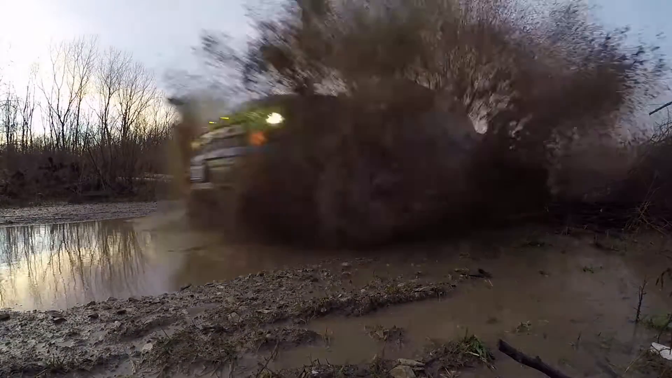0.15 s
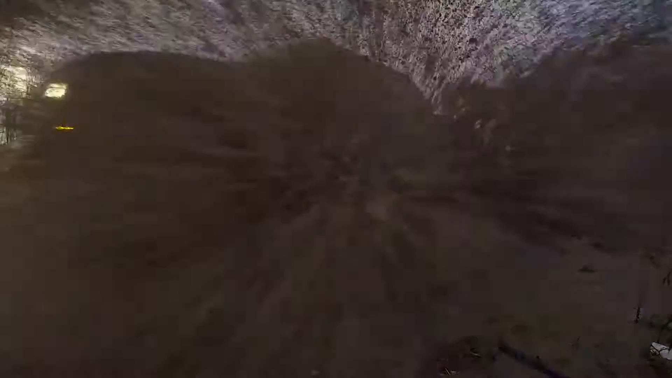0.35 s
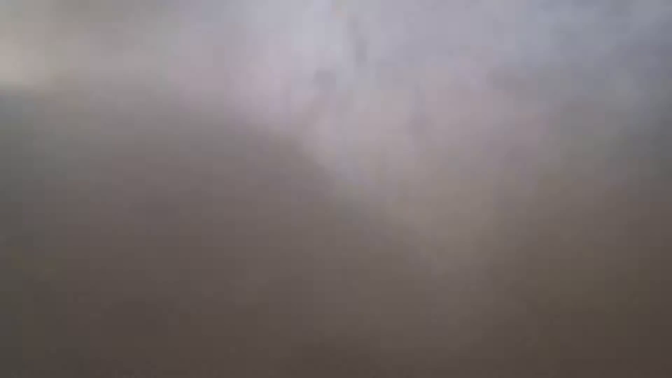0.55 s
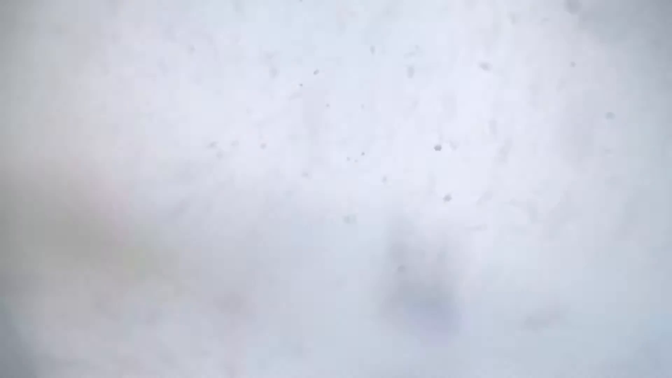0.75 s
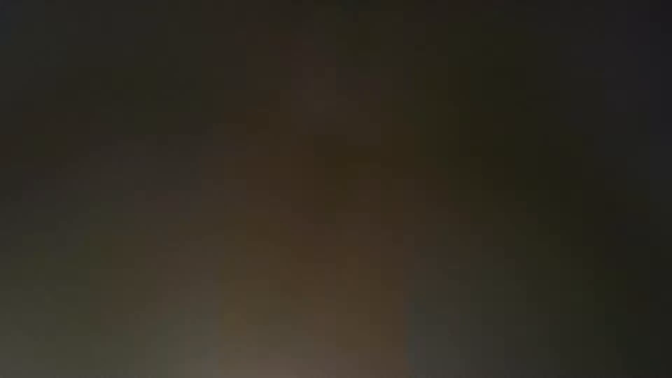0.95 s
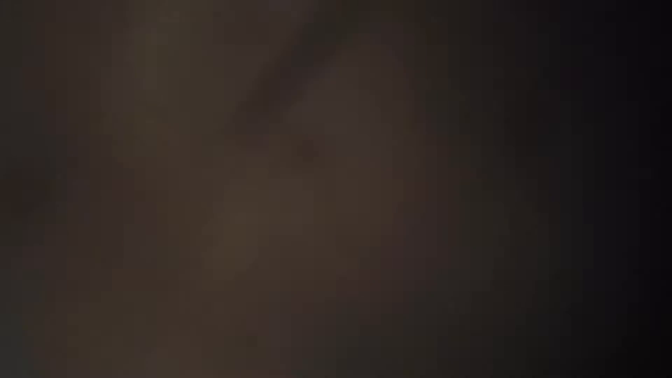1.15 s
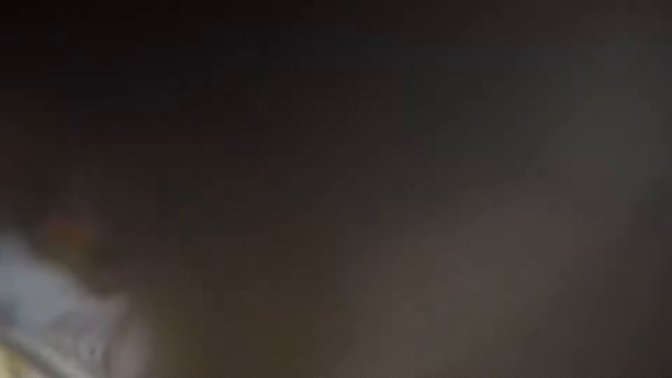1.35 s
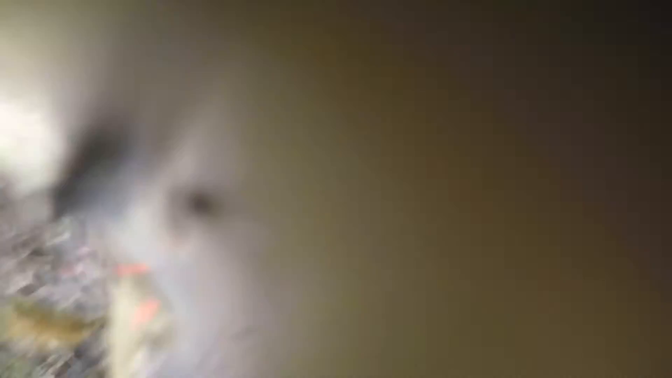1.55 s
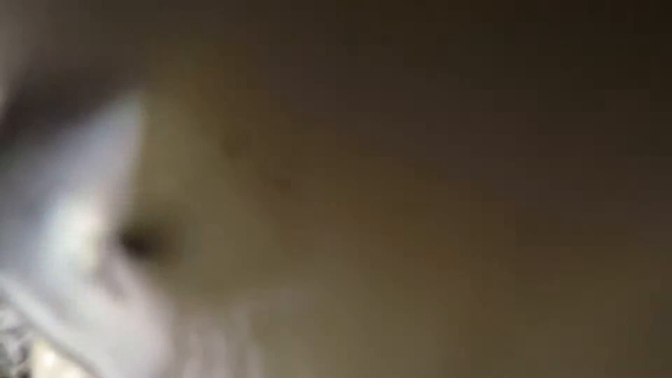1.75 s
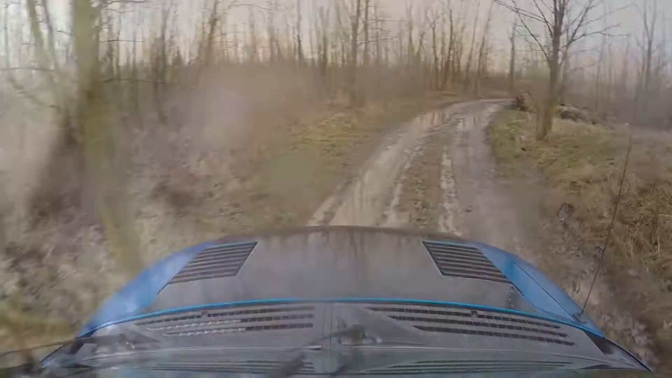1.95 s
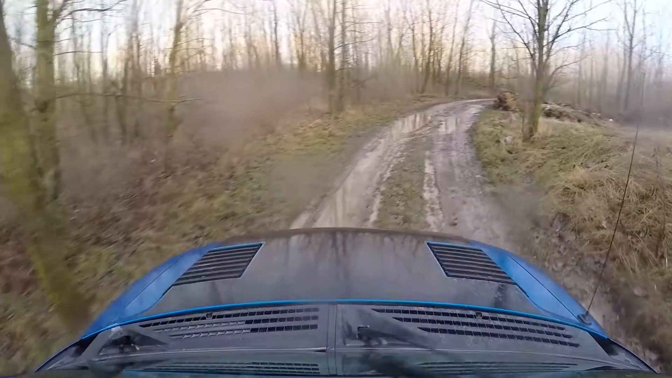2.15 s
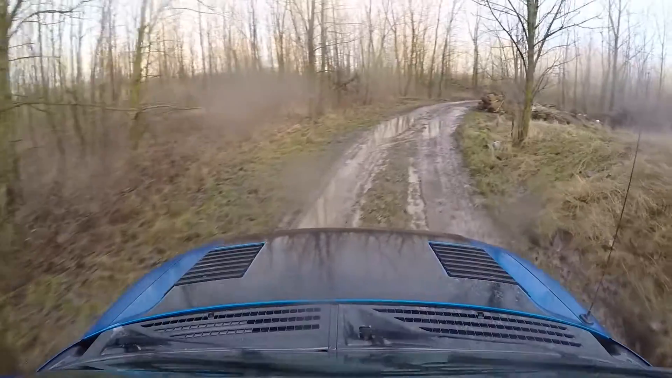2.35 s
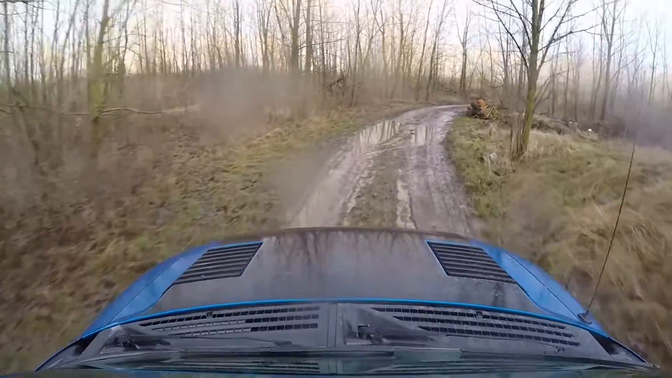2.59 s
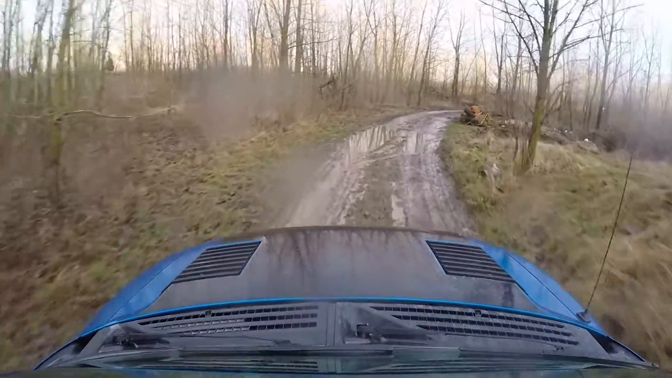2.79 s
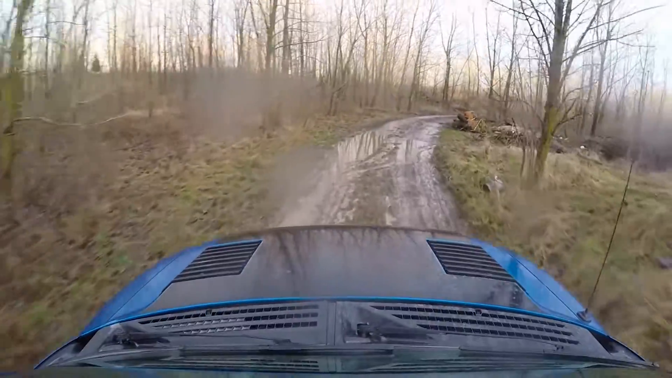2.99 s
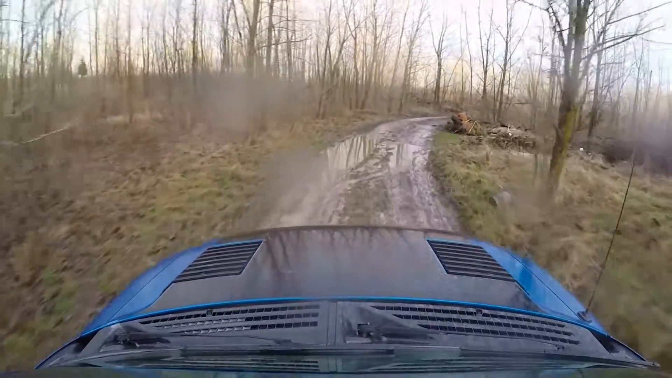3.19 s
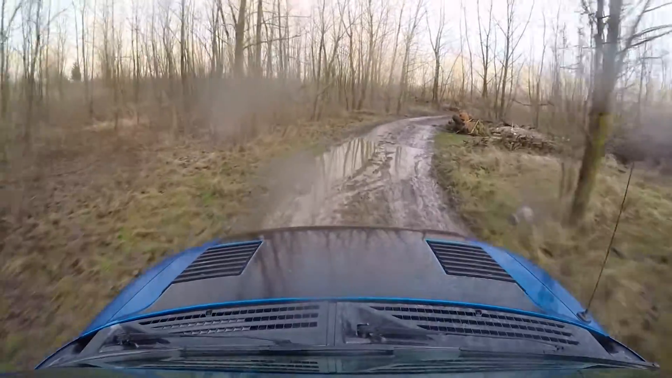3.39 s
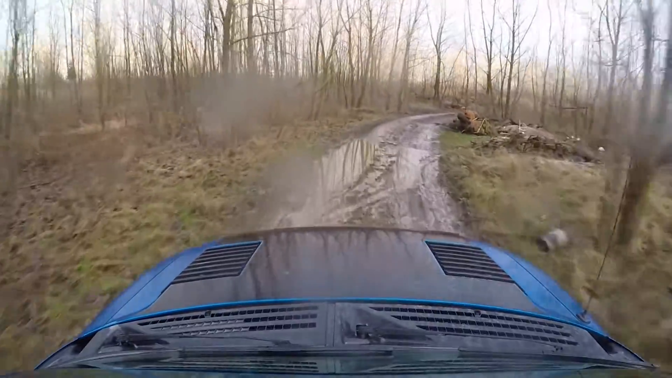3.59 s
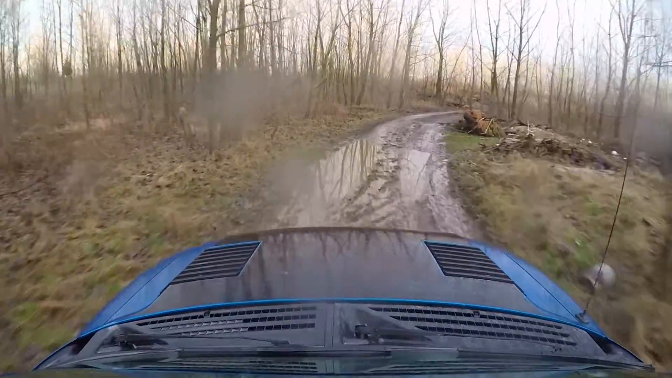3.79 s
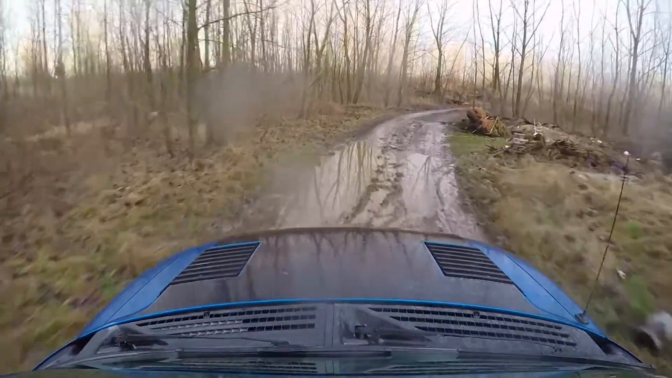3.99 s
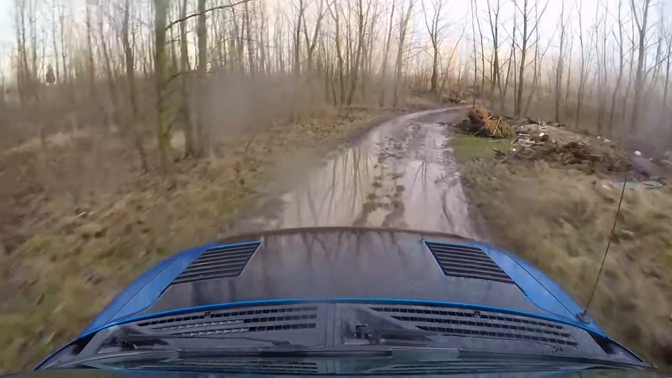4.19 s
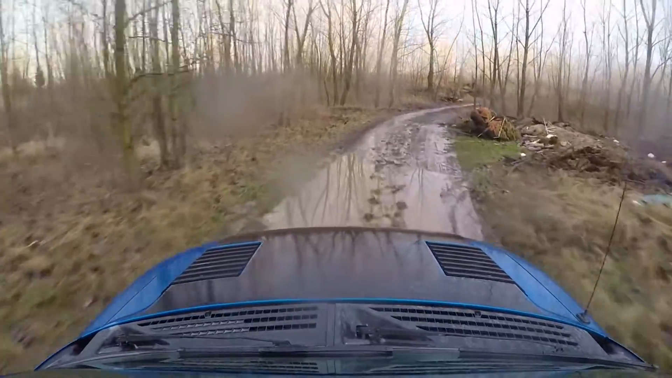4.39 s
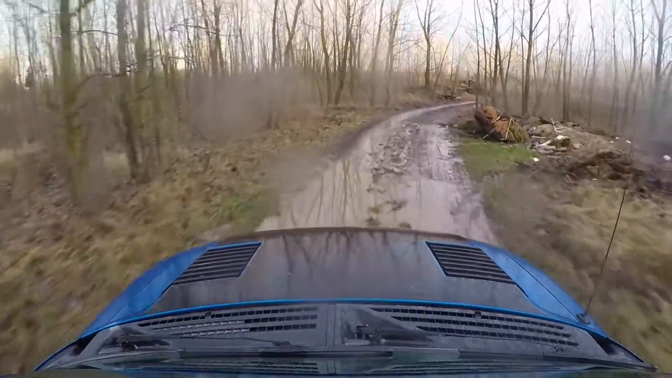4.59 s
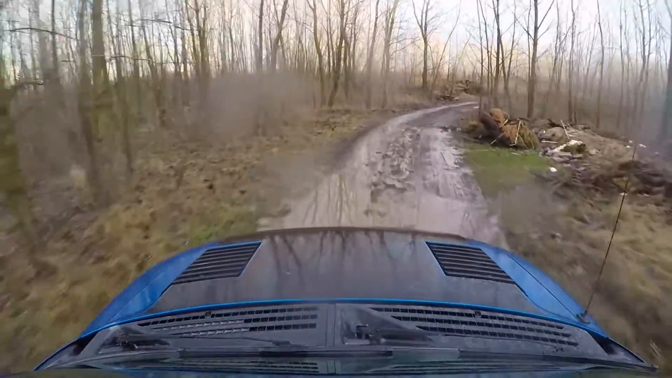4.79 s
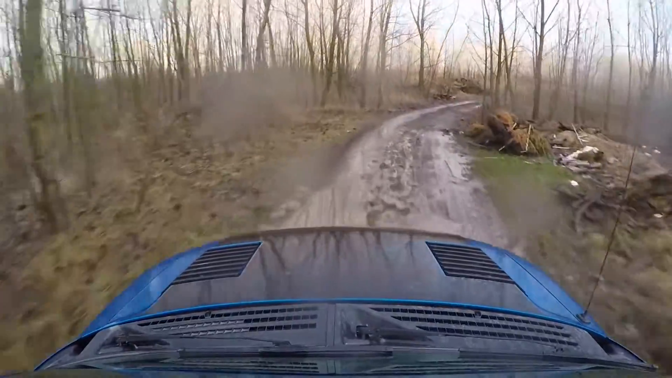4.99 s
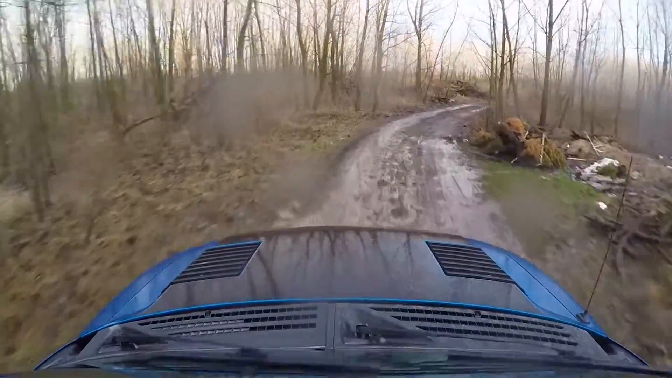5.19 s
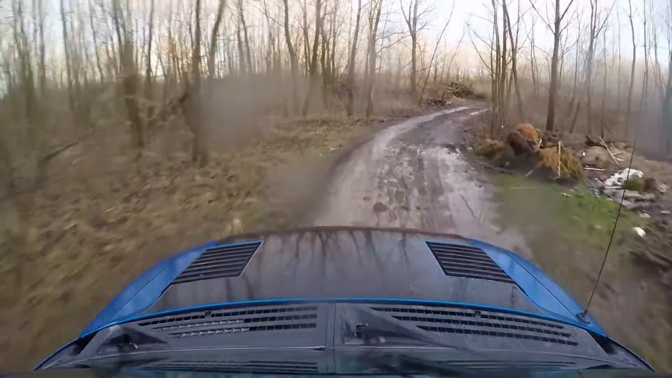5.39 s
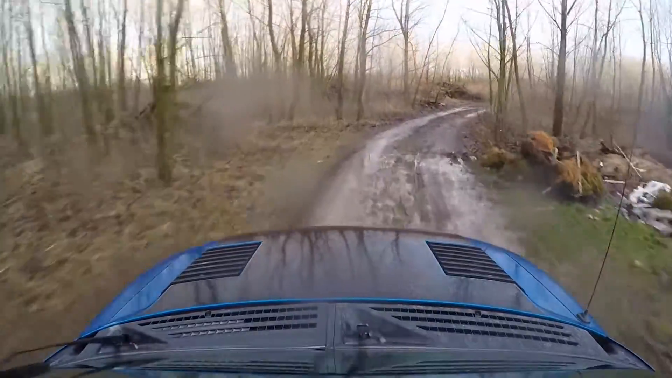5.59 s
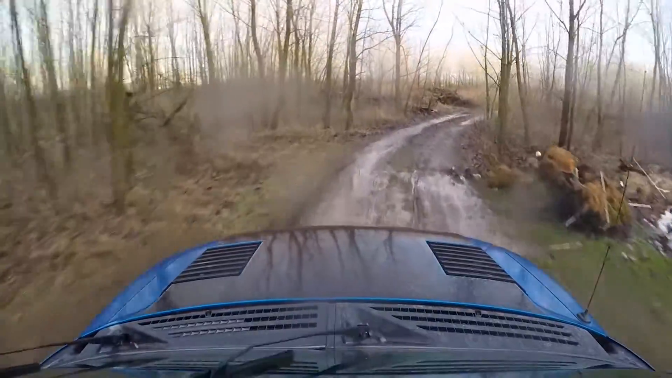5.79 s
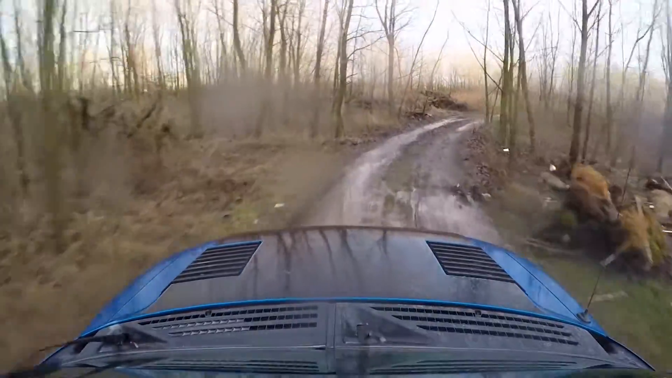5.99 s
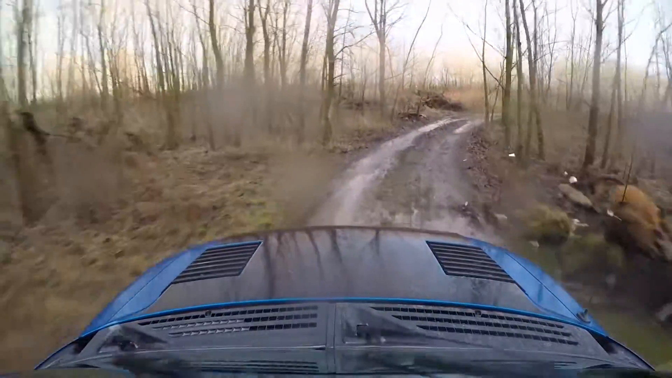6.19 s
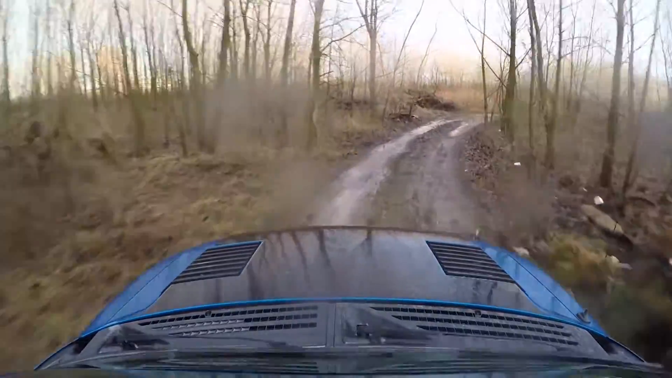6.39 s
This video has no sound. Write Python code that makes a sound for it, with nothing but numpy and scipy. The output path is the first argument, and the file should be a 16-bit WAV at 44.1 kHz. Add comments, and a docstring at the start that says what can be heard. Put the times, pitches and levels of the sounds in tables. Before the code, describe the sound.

Hissing spray and low rumble swell as a pickup drives through a puddle. At about 0.4 seconds a wave of mud hits the microphone housing with a loud cluster of wet slaps and thumps. The housing tumbles, with another hard blow near 0.9 seconds, then weaker knocks while spatter, trickling and sloshing die away. From 1.7 seconds the sound is heard from the truck's roof and is quieter: a deep fluttering shake, drumming panels and faint wet tyre hiss that slowly grows. The low engine drone climbs in pitch until about 5 seconds, then eases, swelling briefly near 3.5 and 5.9. A sharp click comes at 2.5 seconds, and trim buzzes faintly around 2.6 and 3.2. Ruts cause dull booms with metallic rattles near 1.9, 3.1, 4 to 4.6, 5.1 (the strongest) and 5.8. The ride continues to about 6.5 seconds.

```python
"""A puddle on a wet trail, heard from a small sealed microphone housing on the ground.
A pickup nears in swelling spray and rumble. Its wave of mud strikes the housing, which tumbles:
each impact excites the shell's modes and pushes the membrane, and then the water drains off.
From 1.7 s the housing rides on the truck's roof: the mount shakes, road noise drives the panels,
the engine drones, wet tyres hiss, trim buzzes and ruts knock the body."""
import sys
import numpy as np
from scipy import signal
from scipy.fft import rfft, irfft, next_fast_len
from scipy.io import wavfile
from scipy.ndimage import uniform_filter1d

SR = 44100
rng = np.random.default_rng(int(sys.argv[2]) if len(sys.argv) > 2 else 0)


def log_audio(samples):
    """Write samples as a 16-bit WAV file to the path given in sys.argv[1]."""
    # one column per channel
    frames = np.atleast_2d(samples).T
    # limit to full scale, then quantise
    limited = np.clip(frames, -1, 1)
    pcm = np.round(limited * 32767).astype(np.int16)
    wavfile.write(sys.argv[1], SR, pcm)


N = 284445
WAVE_S = .43   # the wave of mud arrives
ROOF_S, ROOF_FADE_S = 1.7, 0.16   # the ride on the roof fades in

# spectrum of the low rumble and slosh: f/Hz, density level/dB
SURGE_SPECTRUM = [(8.8, -43.5), (15, -26), (43, -7), (119, -1.5), (157, -15), (244, -7), (407, -26.5),
                  (500, -17), (650, -53.5), (1100, -120)]


def amp(db):
    """Amplitude ratio of a level in dB."""
    return 10 ** (np.asarray(db) / 20)


def unit(x):
    """Normalise to rms 1."""
    return x / np.sqrt(np.mean(x ** 2) + 1e-20)


def since(s):
    """Seconds elapsed since time s, zero before it."""
    return np.maximum(np.arange(N) / SR - s, 0)


def fade_in(s, lasts=0.021):
    """A gate that opens linearly from time s."""
    return np.minimum(since(s) / lasts, 1)


def in_time(rows):
    """A gate that opens at the first row, then each column interpolated over time."""
    s, *columns = np.transpose(rows)
    return [fade_in(s[0])] + [np.interp(since(0), s, c) for c in columns]


def colour(x, spectrum):
    """Spectral shaping by levels in dB interpolated over log frequency."""
    hz, level_db = np.transpose(spectrum)
    size = next_fast_len(N)
    log_hz = np.log(np.arange(size // 2 + 1) * SR / size + 1)
    gain = amp(np.interp(log_hz, np.log(hz), level_db, -120, -120))
    return irfft(rfft(x, size) * gain, size)[:N]


def cut(x, hz, kind, order=4):
    """Butterworth low- or high-pass."""
    return signal.sosfilt(signal.butter(order, hz, kind, fs=SR, output="sos"), x)


def resonate(x, modes):
    """Modal superposition with alternating signs; each mode is f/Hz, bandwidth/Hz, gain/dB."""
    out = 0
    for k, (hz, width_hz, level_db) in enumerate(modes):
        r = np.exp(-np.pi * max(width_hz, 5) / SR)
        gain = (-1) ** k * amp(level_db) * (1 - r * r) / 2
        feedback = [1, -2 * r * np.cos(2 * np.pi * hz / SR), r * r]
        out = out + signal.lfilter([gain, 0, -gain], feedback, x + 1e-18)
    return out


def drift(rate):
    """Smooth random fluctuation of rms 1, with `rate` new values a second."""
    knots = rng.standard_normal(int(N / SR * rate) + 2)
    curve = np.interp(np.arange(N) * rate / SR, np.arange(len(knots)), knots)
    return unit(uniform_filter1d(curve, int(SR / rate / 2)))


def noise(spectrum):
    """Gaussian noise of rms 1 with the given spectral shape."""
    return unit(colour(rng.standard_normal(N), spectrum))


def grains(per_s, spread_db):
    """A Poisson train of impulses of random size and sign."""
    sizes = amp(spread_db * np.minimum(rng.exponential(1, N), 4)) * rng.choice([-1, 1], N)
    return sizes * (rng.random(N) < per_s / SR)


def add(out, s, shape):
    """Superpose a transient at time s."""
    i = round(s * SR)
    out[i:i + len(shape)] += shape[:N - i]


def two_bands(x, body_db, treble_db, split_hz):
    """A crossover that gives body and treble levels of their own."""
    return amp(body_db) * unit(cut(x, split_hz, "low")) + amp(treble_db) * unit(cut(x, split_hz, "high"))


def relax(first_db, last_db, tau_s):
    """Exponential relaxation of a level after the wave lands."""
    return last_db + (first_db - last_db) * np.exp(-since(WAVE_S) / tau_s)


def trim_buzz():
    """Narrow resonances in series turn noise into a wavering tone that swells and fades at each buzz."""
    # peaks of the trim's vibration: t/s, level/dB
    buzzes = [(2.6, -59), (3.15, -58.5), (3.95, -64)]
    rise_db_per_s, fall_db_per_s = 83, 43
    envelope = sum(amp(db - rise_db_per_s * np.maximum(s - since(0), 0) - fall_db_per_s * since(s))
                   for s, db in buzzes)
    tone = resonate(resonate(rng.standard_normal(N), [(995, 51, 0)]), [(964, 110, 0)])
    return unit(tone) * envelope * amp(4.0 * drift(14.0))


def tyre_hiss():
    """Broadband noise of wet tyres, growing with speed and coloured by cavity resonance in the housing."""
    # spectrum of the hiss: f/Hz, density level/dB
    spectrum = [(300, -36), (450, -8.5), (1400, -2), (3000, -12), (6000, -23.5), (9000, -27), (14500, -34),
                (16000, -61)]
    # strength of the hiss below the crossover: t/s, level/dB
    levels = [(1.7, -65), (2.1, -59.5), (3.4, -55.5), (3.9, -53.5), (5.0, -53), (5.75, -50), (6.45, -49)]
    # resonances of the sealed housing: f/Hz, bandwidth/Hz, gain/dB
    cavity_modes = [(657, 105, 13), (890, 267, 6), (2505, 830, 10), (2904, 110, 5), (4180, 570, 4.5),
                    (5190, 510, 8.5), (6600, 480, 3.5), (13500, 2700, -7)]
    _, hiss_db = in_time(levels)
    hiss = noise(spectrum)
    hiss = hiss + sum(resonate(hiss, [mode]) for mode in cavity_modes)
    hiss *= amp(0.56 * drift(25.))
    return fade_in(ROOF_S, ROOF_FADE_S) * two_bands(hiss, hiss_db, hiss_db - 11, split_hz=4890)


def approach():
    """Countless droplets sum to a smooth hiss over the truck's rumble; both swell as the range closes."""
    # spectrum of the spray: f/Hz, density level/dB
    spray_spectrum = [(180, -32.5), (300, -5.5), (425, -17.5), (634, -14.5), (870, -7.5), (1250, -12.5),
                      (2570, -1.5), (3290, -14.5), (5080, -9.5), (8940, -27.5), (12700, -30), (15200, -32),
                      (16000, -46)]
    spray_db_per_s, spray_full_s, rumble_db_per_s = 39.5, .29, 22.5
    t = np.minimum(since(0), WAVE_S)
    spray_db = -50 + spray_db_per_s * np.minimum(t, spray_full_s)
    spray = noise(spray_spectrum) * amp(spray_db + drift(31.0))
    rumble = noise(SURGE_SPECTRUM) * amp(-53.5 + rumble_db_per_s * t)
    return (1 - fade_in(WAVE_S)) * (spray + rumble)


def engine():
    """Periodic firing gives a tone and a half order above it; uneven firing modulates each separately."""
    # drone at the firing frequency: t/s, f/Hz, level/dB
    drone = [(1.8, 102, -47.5), (2.38, 104.4, -50.5), (2.6, 120.5, -42.5), (3.0, 117, -45),
             (3.48, 126.3, -36), (3.75, 124.4, -40), (4.04, 137.2, -53), (4.55, 145.7, -42.5),
             (4.7, 149.4, -44.5), (5.1, 149.3, -40.5), (5.3, 140, -48.5), (5.8, 126, -51.5),
             (5.94, 125.8, -31.5), (6.06, 134, -46), (6.45, 134, -48)]
    # partials: multiple of the firing frequency, relative level/dB
    orders = [(1, 1), (1.5, -10.5)]
    gate, hz, level_db = in_time(drone)
    phase = 2 * np.pi * np.cumsum(hz * (1 + .012 * drift(12.0))) / SR
    partials = sum(amp(db + 3.9 * drift(7.3)) * np.sin(k * phase) for k, db in orders)
    return gate * amp(level_db) * partials


def panel_drumming():
    """Forced vibration: road noise drives the panels into a low drumming and a faint modal ring."""
    # spectrum of the drumming: f/Hz, density level/dB
    spectrum = [(16, -67), (28, -13), (41, -22.5), (54, -11), (64, -22.5), (86, -21.5), (104, -24),
                (116, -15), (178, -11.5), (217, -16), (270, -32.5), (350, -70), (590, -120)]
    # strength of the drumming: t/s, level/dB
    levels = [(1.69, -47.5), (1.95, -44.5), (2.4, -42.5), (2.55, -39), (4.06, -39.5), (5.12, -46),
              (6.45, -46)]
    gate, drum_db = in_time(levels)
    drum = noise(spectrum) * amp(drum_db + 1.73 * drift(18.0))
    ring = resonate(rng.standard_normal(N), [(334.4, 38, -0.5), (456, 280, -15.5)])
    ring_db = 0.66 * drum_db - 34.0 + 4.0 * drift(6.6)
    return gate * (drum + unit(cut(ring, 600, "low")) * amp(ring_db))


def runoff():
    """Draining water: flow noise and low sloshing die away as drops excite brief rings on the shell."""
    # spectrum of the trickle and drops: f/Hz, density level/dB
    spectrum = [(180, -34.5), (300, -8), (425, -14.5), (634, 7.5), (1080, -3.5), (1810, -4.5), (3290, -5.5),
                (7570, -16), (12500, -24), (16000, -31.5)]
    drops_per_s, thinning_s = 550, 0.54
    gate = fade_in(WAVE_S) - fade_in(ROOF_S, ROOF_FADE_S)
    trickle = noise(spectrum) * amp(0.83 * drift(40.))
    drops = grains(drops_per_s * np.exp(-since(WAVE_S) / thinning_s) * gate, spread_db=3.0)
    pitches = np.geomspace(900, 10000, num=8)
    size_class = rng.integers(0, len(pitches), N)   # a drop's size sets its pitch
    rings = sum(resonate(drops * (size_class == k), [(hz, 0.23 * hz, 0)]) for k, hz in enumerate(pitches))
    ticks = amp(-6) * unit(colour(rings, spectrum))
    slosh = noise(SURGE_SPECTRUM) * amp(relax(-26.5, -110, tau_s=1.32) + 2.0 * drift(5.2))
    body_db, treble_db = relax(-33.5, -71, tau_s=0.44), relax(-43, -78.5, tau_s=0.31)
    return gate * (two_bands(trickle + ticks, body_db, treble_db, split_hz=2900) + slosh)


def spatter():
    """A Poisson process of brief bright splashes whose rate and strength decay after the wave."""
    splashes_per_s, thinning_s, fall_db_per_s, splash_s = 150., .35, 29.5, 0.00066
    age = since(WAVE_S)
    hits = np.abs(grains(splashes_per_s * np.exp(-age / thinning_s) * (age > 0), spread_db=2.5))
    envelope = signal.lfilter([1], [1, -np.exp(-1 / (splash_s * SR))], hits + 1e-18)
    splashes = cut(envelope * rng.standard_normal(N), 2500, "high", order=2)
    return cut(splashes, 7000, "low", order=1) * amp(-30 - fall_db_per_s * age)


def rut_knocks():
    """Shock excitation: each rut sets the panels booming and loose metal clanking and rattling."""
    # jolts of the body: t/s, boom level/dB, rattle drive level/dB, boom f/Hz, clank f/Hz
    jolts = [(1.91, -34, -49, 199, 605), (1.943, -29, -49, 133, 956), (3.049, -37, -42.5, 203, 1233),
             (3.095, -39, -39, 160.5, 1010), (3.138, -28, -50, 179, 960), (3.979, -34, -51, 206.5, 670),
             (4.349, -30.5, -64, 176, 732), (4.587, -26.5, -46.5, 140.4, 735),
             (5.116, -19.5, -41, 182.3, 687), (5.149, -24.5, -41, 154.5, 587), (5.722, -44, -53, 149, 980),
             (5.83, -31, -47.5, 118, 697), (5.879, -29.5, -46, 167.4, 610), (6.379, -58, -49, 150, 674)]
    # resonances of loose metal: f/Hz, bandwidth/Hz, gain/dB
    loose_modes = [(333, 47, 19.5), (646, 55, 21.5), (959, 23, 20.5), (1200, 59, 12.0), (1630, 40, 12.0)]
    knocks, rattle_drive = np.zeros((2, N))
    t = np.arange(round(.2 * SR)) / SR
    age = t / 0.011   # the boom peaks after 11 ms
    for s, boom_db, rattle_db, boom_hz, clank_hz in jolts:
        boom = np.sin(2 * np.pi * boom_hz * t) + 0.058 * np.sin(2 * np.pi * 345. * t)
        add(knocks, s, amp(boom_db) * boom * age * np.exp(1 - age))
        shake = amp(rattle_db) * np.minimum(age / .45, 1) * np.exp(-age ** 2 / 3)
        add(rattle_drive, s, shake)
        clank_modes = [(clank_hz, 150, 19), (1.296 * clank_hz, 150, 15)]
        clank = resonate(shake * rng.standard_normal(len(t)), clank_modes)
        add(knocks, s, cut(clank, 2300, "low"))
    contacts = rattle_drive * unit(grains(5000., spread_db=-4.0))
    return knocks + cut(resonate(contacts, loose_modes), 2160, "low")


def pop():
    """One sharp click: a sudden step in the signal that dies away."""
    start_s, peak_db, t60_s = 2.4762, -25, 0.099
    click = np.zeros(N)
    t = np.arange(round(.2 * SR)) / SR
    add(click, start_s, amp(peak_db - 60 * t / t60_s))
    return click


def mount_shake():
    """Near-sinusoidal vibration of the mount, modulated in pitch and size as the road kicks it."""
    # size of the vibration: t/s, relative level/dB
    levels = [(1.5, -51.5), (2.09, -23.5), (2.45, -38), (2.51, -25.5), (2.93, -28), (3.5, -22.5),
              (3.97, -32), (4.08, -20.5), (4.59, -23.5), (4.74, -20), (5.29, -26), (5.4, -19), (5.57, -19),
              (5.68, -34), (5.79, -23), (6.45, -20)]
    early_hz, late_hz = 22.46, 20.77
    gate, level_db = in_time(levels)
    hz = early_hz + (late_hz - early_hz) * fade_in(3.75, lasts=.25)
    phase = 2 * np.pi * np.cumsum(hz * (1 + 0.063 * drift(10.0))) / SR
    return gate * amp(level_db + 2.0 + 2.0 * drift(14.)) * np.sin(phase)


def mud_slaps():
    """Impact excitation: each gritty burst has a wet ring, rings the shell and pushes the membrane."""
    # mud slaps and tumbling blows, levels relative:
    # t/s, crack level/dB, treble level/dB, thump level/dB, thump f/Hz, splat f/Hz
    impacts = [(0.324, -21.5, -55, -55, 107, 2340), (0.425, -15, -34, -37, 77, 2230),
               (0.438, -1.5, -9, -12.5, 186, 2870), (0.445, -12, -2, -22, 70, 1070),
               (0.451, -10, -4.5, -21, 191, 990), (0.461, -10.5, -17, -19, 99, 826),
               (0.48, -10, -18, -20, 70.6, 2970), (0.492, -18, -18, -25, 135, 1870),
               (0.506, -13, -6, -38, 78, 1870), (0.519, -18.5, -27, -31.5, 77.6, 4300),
               (0.536, -27, -30, -42.5, 77.7, 2700), (0.551, -36, -34, -50, 78, 4030),
               (0.573, -23.5, -24, -49, 110.2, 2780), (0.6, -24.5, -21, -26.5, 128, 1160),
               (0.642, -26, -22, -35.5, 69.6, 2450), (0.654, -20, -34, -33, 119, 4300),
               (0.744, -22, -40, -31.5, 109, 3060), (0.777, -28, -36, -45, 151, 810),
               (0.795, -24.5, -29.5, -44, 94, 1760), (0.836, -19.5, -55, -27, 115, 800),
               (0.842, -8.5, -59, -12.5, 74, 800), (0.857, -26, -38, -18, 106, 1200),
               (0.89, -8.5, -29.5, -15, 70, 1260), (0.897, 1.5, -8.5, -11.5, 70, 700),
               (0.91, -27, -53, -44, 70, 2520), (0.971, -30, -48, -28, 70, 1070),
               (1.005, -25, -40, -34, 120, 1660), (1.015, -24.5, -43, -40, 73, 1620),
               (1.04, -30, -64, -44, 140, 1050), (1.093, -14.5, -55, -26, 83.5, 2000),
               (1.137, -36, -68, -38, 69.6, 2400), (1.154, -26.5, -43, -35, 146, 800),
               (1.16, -28, -65, -33, 108, 1160), (1.181, -42, -70, -41.5, 100, 800),
               (1.272, -40.5, -67, -37, 127, 690), (1.308, -43.5, -62, -49, 93, 1390),
               (1.324, -45, -59, -50, 139, 3860), (1.393, -48, -78, -66, 97, 711),
               (1.543, -50, -55, -63.5, 70, 2410), (1.556, -46.5, -68, -51, 72, 2350),
               (1.605, -28, -66.5, -26, 177, 730), (1.701, -41.5, -59.5, -33.5, 92, 900),
               (1.798, -45, -51.5, -52, 69.7, 2400), (2.33, -44, -51.5, -60, 70, 3000)]
    # resonances of the housing's shell: f/Hz, bandwidth/Hz, gain/dB
    shell_modes = [(310, 410, 4), (586, 250, 6.5), (1084, 210, 5), (2450, 400, 5.5), (3226, 1200, -1),
                   (4540, 250, -9)]
    burst_s, smear_s, log_decrement = 0.0022, 0.0075, 1.75
    crack, treble, direct = np.zeros((3, N))
    t = np.arange(round(.1 * SR)) / SR
    age = t / burst_s
    wet_smear = 0.12 * np.exp(-t / smear_s)
    burst = np.minimum(age / 0.32, 1) * (np.exp(-age) + wet_smear)
    signs = rng.choice([-1, 1], len(impacts))
    for (s, crack_db, treble_db, thump_db, thump_hz, splat_hz), sign in zip(impacts, signs):
        add(crack, s, amp(crack_db) * burst)
        add(treble, s, amp(treble_db) * burst)
        ring = resonate(burst * rng.standard_normal(len(t)), [(splat_hz, 0.27 * splat_hz + 150, 11)])
        splat = resonate(ring, [(splat_hz, splat_hz, 0)])
        add(direct, s, amp(crack_db) * splat * np.sqrt(2000 / splat_hz))
        thump_envelope = np.minimum(t / 0.0015, 1) * np.exp(-t * thump_hz * log_decrement)
        add(direct, s, sign * amp(thump_db + 13.0) * thump_envelope * np.sin(2 * np.pi * thump_hz * t))
    grit = unit(grains(11000.0, spread_db=3.0))
    shell = cut(resonate(crack * grit, shell_modes), 4200, "low")   # mud damps the top modes
    sizzle = cut(cut(treble * grit, 2800, "high"), 4100, "low", order=1)
    return amp(3.5) * shell + amp(0.5) * sizzle + direct


def scene():
    """Linear superposition of all sources at one microphone."""
    puddle = approach() + runoff() + mud_slaps() + spatter()
    ride = mount_shake() + panel_drumming() + tyre_hiss() + engine() + rut_knocks() + pop() + trim_buzz()
    return (puddle + ride)[None]


def record(dry):
    """Soft saturation flattens peaks at the overload amplitude; a steep low-pass limits the bandwidth."""
    overload, stopband_hz = .37, 16197.5
    clipped = dry / (1 + np.abs(dry / overload) ** 6) ** (1 / 6)
    return signal.sosfilt(signal.cheby2(10, 60, stopband_hz, fs=SR, output="sos"), clipped)


dry = scene()
out = record(dry)
log_audio(out)
```